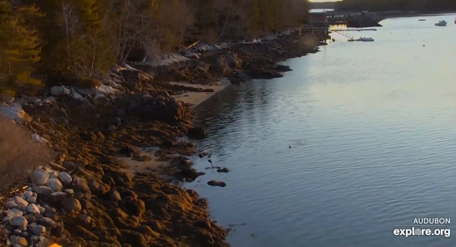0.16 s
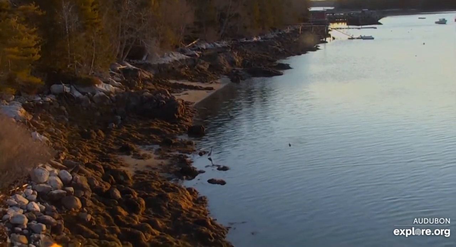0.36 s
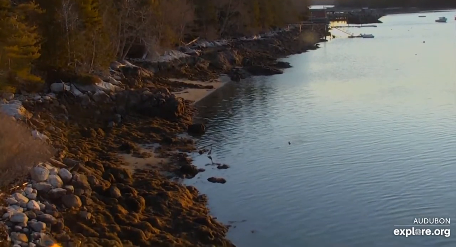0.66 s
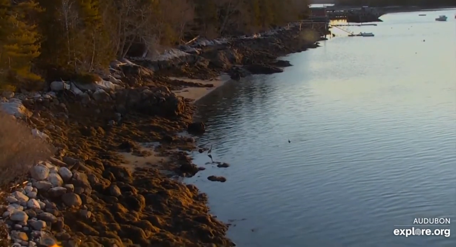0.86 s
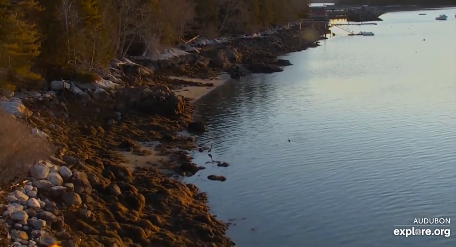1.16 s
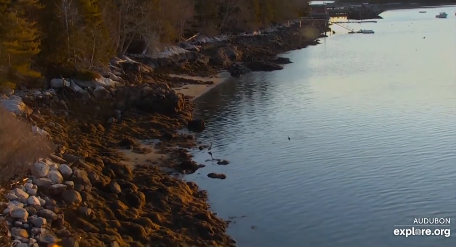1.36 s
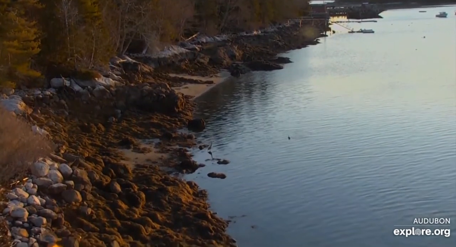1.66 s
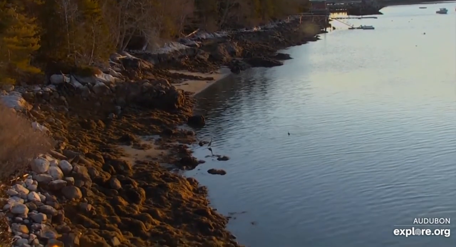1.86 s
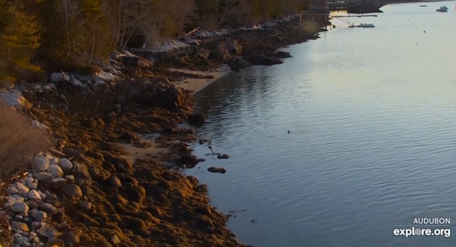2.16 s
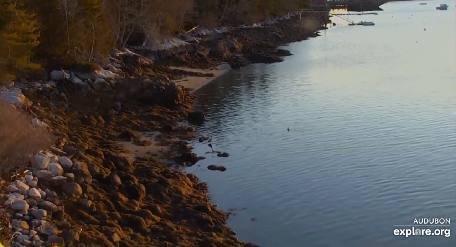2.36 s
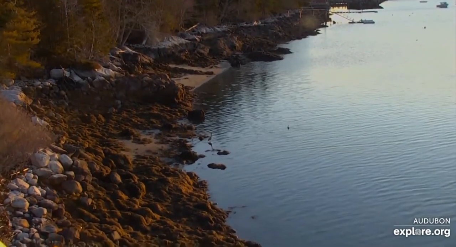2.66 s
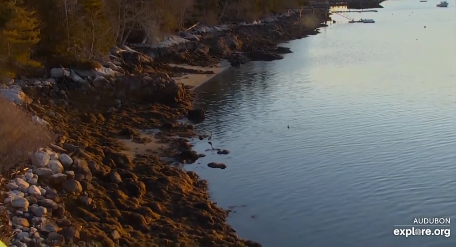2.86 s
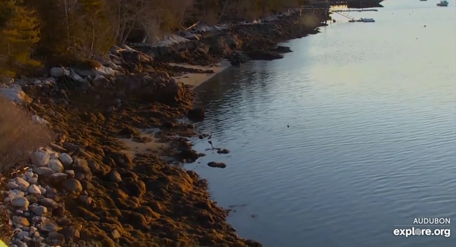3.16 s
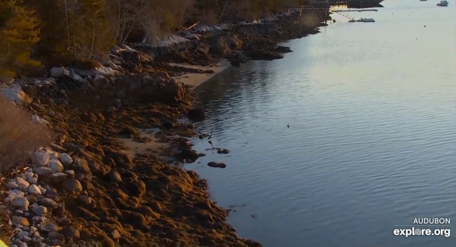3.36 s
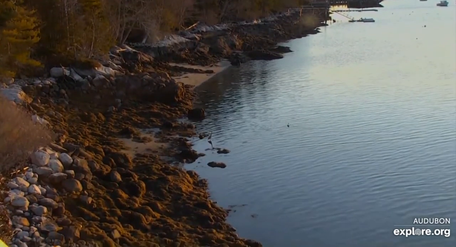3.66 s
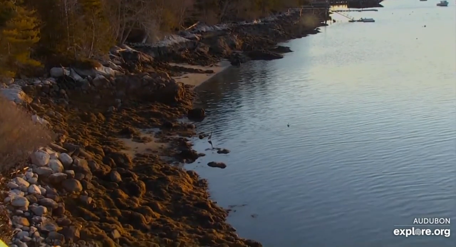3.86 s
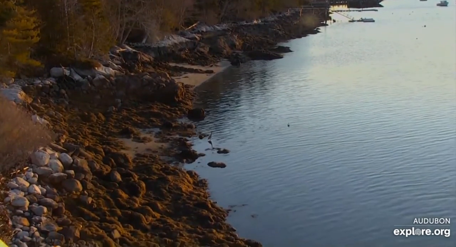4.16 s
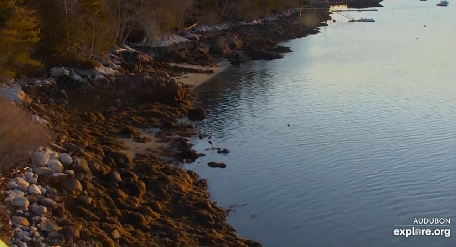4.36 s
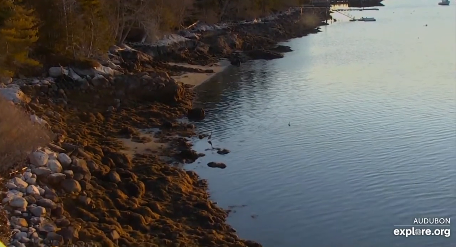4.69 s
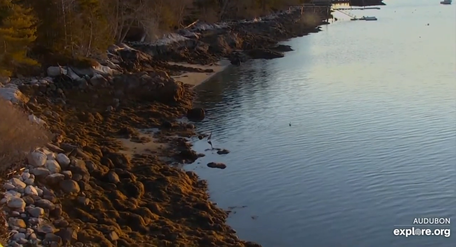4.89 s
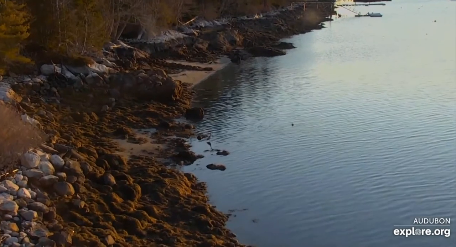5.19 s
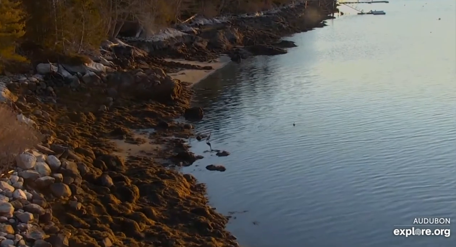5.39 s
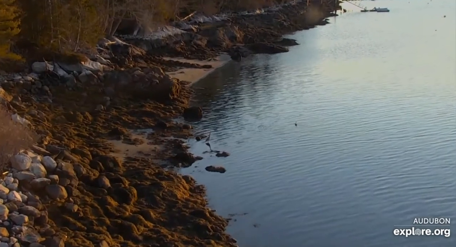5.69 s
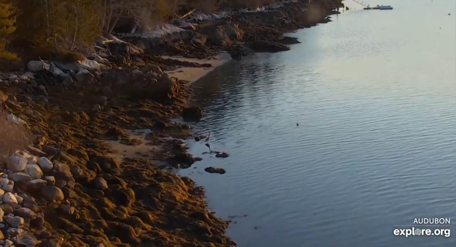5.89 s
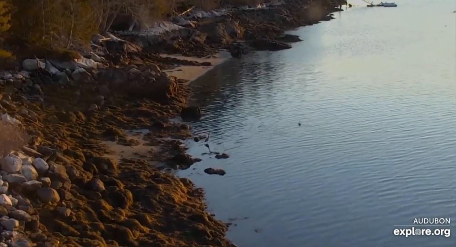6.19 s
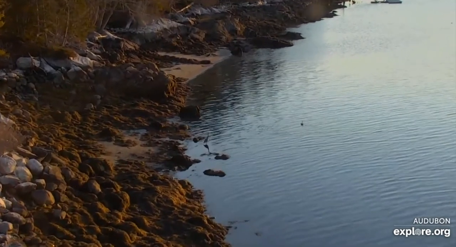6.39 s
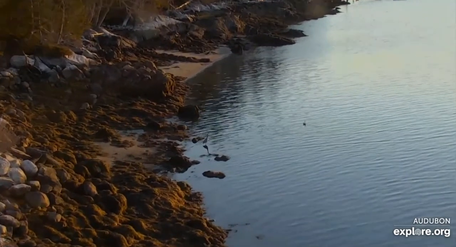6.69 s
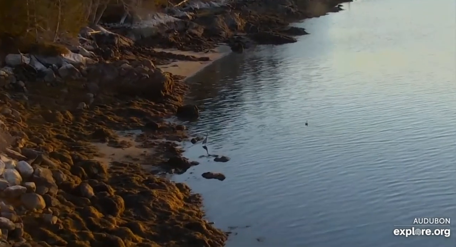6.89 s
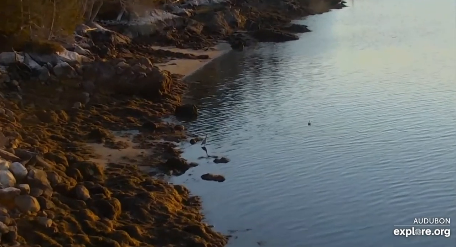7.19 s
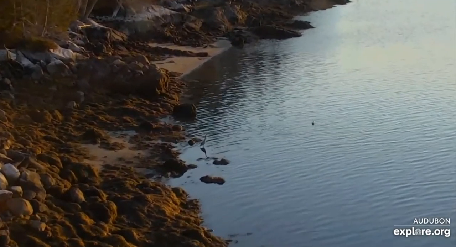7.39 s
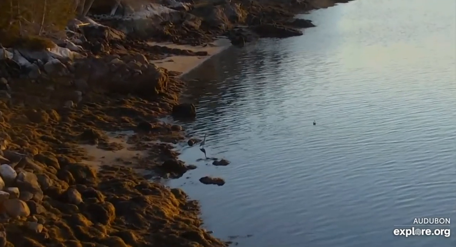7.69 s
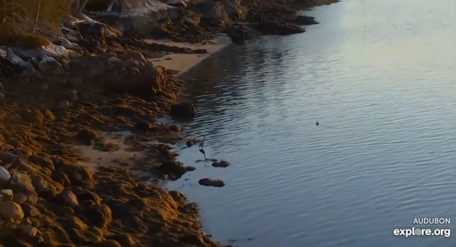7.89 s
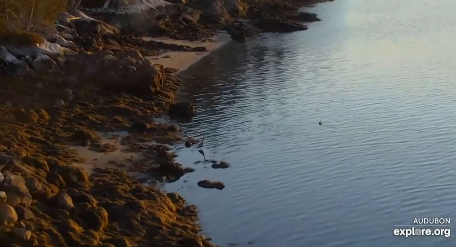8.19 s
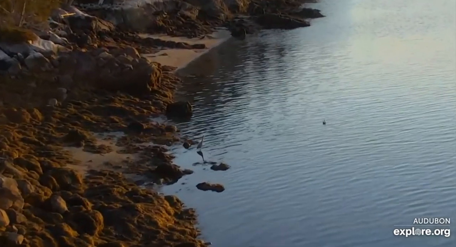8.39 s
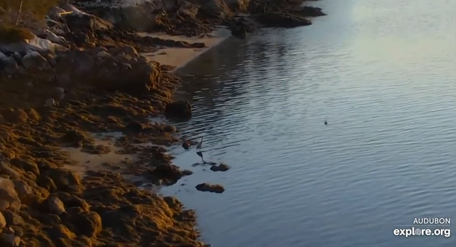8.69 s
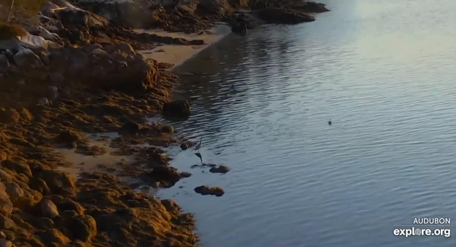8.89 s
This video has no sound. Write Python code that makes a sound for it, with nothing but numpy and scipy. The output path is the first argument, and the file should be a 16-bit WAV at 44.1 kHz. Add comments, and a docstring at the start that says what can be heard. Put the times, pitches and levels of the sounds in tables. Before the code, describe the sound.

Beside calm water, an osprey gives six short piercing down-sliding chirps, the loud ones distorting, over faint hum, light wind and tiny distant songbirds.

```python
"""Osprey calling over an inlet

An osprey whistles six sharp falling calls right beside a nest microphone; the loud ones overload it.
Each call is a sliding tone with overtones, and the trees and the far shore throw it back as many small echoes.
Small glides warble far away, and a few dry ticks of noise are heard.
Wind rumbles on the microphone, mostly at the start and the end, over a faint hum and soft outdoor noise."""
import sys
import numpy as np
from scipy import signal
from scipy.fft import rfft, irfft, next_fast_len
from scipy.io import wavfile
from scipy.ndimage import uniform_filter1d

SR = 44100
rng = np.random.default_rng(int(sys.argv[2]) if len(sys.argv) > 2 else 0)


def pcm_store(signal):
    """Save signal as 16-bit PCM."""
    levels = np.round(np.clip(np.atleast_2d(signal), -1, 1) * 32767)
    wavfile.write(sys.argv[1], SR, levels.astype(np.int16).T)


N = 399105
TIME = np.arange(N) / SR  # seconds

# level of the low hum: t/s, level/dB
HUM_LEVEL = [(0, -52), (1.5, -53), (3.0, -55.5), (4.0, -60), (5.2, -64), (6.1, -69.5), (7.0, -79.5),
             (7.6, -57), (9.05, -52.5)]
HUM_HZ = 106
# thin, nearly steady tones: f/Hz, level/dB
THIN_TONES = [(237, -85), (378, -84.5), (508, -77), (845, -75.5), (1168, -83.5), (1696, -72.5),
              (15770, -83.5)]
# spectrum of the soft outdoor noise: f/Hz, relative level/dB per Hz
AIR_COLOUR = [(25, 3.5), (80, 10), (190, -3), (400, 1), (900, 1), (1400, -1.5), (2000, -3), (2450, -3.5),
              (2850, -15.5), (4000, -14), (6000, -22.5), (10000, -21), (13000, -27.5), (16000, -29.5)]
AIR_DB = -58
# spectrum of the low wind rumble: f/Hz, relative level/dB per Hz
RUMBLE_COLOUR = [(18, -12.5), (38, -3), (55, 4), (85, 0.5), (110, -4), (150, -19), (210, -32.5),
                 (400, -44.5)]
# spectrum of the smaller, higher eddies: f/Hz, relative level/dB per Hz
EDDY_COLOUR = [(70, -20), (115, -0.5), (170, 0), (250, -12.5), (400, -17), (700, -30.5), (1400, -46),
               (3000, -66)]
# gusts on the microphone: peak t/s, half-width/s, rumble level/dB
WIND_GUSTS = [(0.048, .06, -18.5), (0.161, 0.1, -21.5), (0.339, .07, -38.5), (.68, .28, -42.5),
              (3.17, .16, -53), (5.881, .08, -44), (6.52, 0.22, -52), (7.06, .13, -51.5), (7.849, .1, -44),
              (8.52, .14, -41), (8.86, .17, -36)]
CALM_DB = -70.5  # rumble between the gusts
HARD_GUST_DB, EDDY_POWER = -19.5, 1.5  # small eddies grow faster than the rumble
DIP_S, DIP_LENGTH_S, DIP_DB = .283, .024, -21  # wind, hum and air dip briefly

# small ticks: t/s, level/dB, centre f/Hz
DRY_TICKS = [(0.14, -42, 1120), (.159, -44, 1100), (0.295, -50, 964), (1.706, -50.5, 4500),
             (4.927, -59, 3700), (6.159, -49, 4100)]

# osprey calls: t/s, length/s, top f/Hz, end f/Hz, shoulder (0-1), opening flick/Hz, flick length/s,
# attack/s, time to the dip/s, first level/dB, dip depth/dB, level after the dip/dB,
# octave level/dB, share sent to the shore/dB
OSPREY_CALLS = [(.968, 0.097, 2510, 2024, 1, 300, 0.0044, 0.0059, 0.046, -18.5, -13.5, -3.5, -18, 3),
                (2.149, 0.12, 2635, 1998, 0.93, 425, 0.0056, 0.015, 0.058, -0.3, -15, -4.5, -13, -0.5),
                (3.243, .12, 3032, 2112, 0.06, 729.4, .0096, .021, .076, 3.5, -6.5, -7, -12.2, -0.5),
                (4.328, .116, 2663, 2126, .2, 513, .007, .013, 0.053, -2, -2, -10.5, -17.5, -.5),
                (5.385, .138, 3238, 2126, 0, 1142, 0.023, 0.037, .093, 5.5, -4.5, -11.5, -13, -1.1),
                (6.66, 0.12, 2821, 2054, 0, 992, .0115, 0.024, .067, 2, -5, 1.33, -12.5, -4.5)]
GLIDE_CURVE = 1.303  # the fall slows towards the end of a call
FLICK_POWER = 3  # the opening flick hangs for a moment, then drops
ONSET_DB, RELEASE_DB, RELEASE_S = -36.5, -26.5, .026  # how far under its level a call starts and ends
SAG_S, RECOVER_S = .022, .018  # the level sags into a short dip and recovers
# how strongly the throat passes the octave: f/Hz, gain/dB
THROAT_GAIN = [(3900, -7.5), (4300, -8.5), (4750, -0.5), (5200, -5), (5800, -8), (6600, -27.5),
               (8800, -49.5)]
# spectrum of the breath in a call: f/Hz, relative level/dB per Hz
BREATH_COLOUR = [(1400, -22.5), (2500, -1.5), (5000, 1), (12000, -26.5)]

# tone colour of what the shore sends back: f/Hz, gain/dB
ECHO_COLOUR = [(1900, -2.5), (2400, 8), (2800, -7), (3400, -11.5), (4500, -2), (5800, -4.5), (7000, 2.5),
               (10000, -2), (15000, -21)]
ROCKS_DB = -5
TREES_S, TREES_RISE_S, TREES_DB, TREES_T60_S = .095, .045, -.5, .35  # T60: time to fade by 60 dB
INLET_DB, INLET_T60_S = -26.5, 2.9
FAR_BANK_S, FAR_BANK_WIDTH_S, FAR_BANK_DB = .8, .12, -40.5  # a last soft swell from the far bank

# two phrases of a distant songbird, a row a note:
# t in the phrase/s, length/s, start f/Hz, middle f/Hz, end f/Hz, level within the phrase/dB
CHIP_NOTES = [(0, 0.04, 6240, 5650, 5190, -7), (.028, 0.029, 5454, 4530, 3673, 4.5),
              (.068, .06, 3200, 3450, 3900, -6.5)]
SLUR_NOTES = [(0, 0.088, 3780, 4340, 5700, 0), (.103, 0.023, 5150, 4430, 3810, 0)]
# when each phrase is sung: t/s, level/dB
CHIP_TIMES = [(2.614, -60), (2.812, -60), (2.99, -61), (3.183, -65.5), (8.15, -70), (8.34, -69),
              (8.515, -68.5)]
SLUR_TIMES = [(3.596, -61), (3.86, -62.5), (4.13, -63.5)]
# single distant notes: t/s, length/s, start f/Hz, middle f/Hz, end f/Hz, level/dB
SINGLE_NOTES = [(2.435, .085, 4870, 4380, 5000, -56), (2.518, .016, 3760, 4440, 5400, -58),
                (7.27, 0.063, 3794, 4080, 4150, -71.5), (7.694, 0.0713, 3250, 3370, 3610, -71),
                (7.897, 0.29, 1644, 1676, 1690, -61), (7.96, .13, 3993, 4400, 4570, -70),
                (8.211, .09, 3700, 3840, 3980, -71), (8.69, .11, 4320, 4660, 4640, -58),
                (8.92, .11, 4180, 4250, 5200, -66)]

# rasp of the overload: f/Hz, relative level/dB per Hz
RASP_COLOUR = [(300, -9.5), (1500, -5), (3000, -1), (16000, -5.5)]
# thump of the overload: f/Hz, relative level/dB per Hz
THUMP_COLOUR = [(30, -15.5), (70, 3), (110, 1), (170, -11.5), (260, -17.5), (450, -28.5)]
# final tone balance, lower near 10 kHz and a little raised near 13 kHz: f/Hz, gain/dB
INPUT_COLOUR = [(1, 1.5), (7000, -0.5), (10000, -3), (13000, 1), (23000, .5)]
TOP_HZ = 15900  # nearly everything above this is cut


def undb(db):
    """Turns decibels into gain."""
    return np.exp(np.asarray(db) * np.log(10) / 20)


def ramp(t, start, length):
    """Rises from 0 to 1 over the given stretch of time."""
    return np.clip((t - start) / length, 0, 1)


def walk(rate, count=N):
    """Wanders at random: values held for 1 / rate seconds and smoothed twice; spread 1."""
    k = max(int(SR / rate), 1)
    y = np.repeat(rng.standard_normal(count // k + 1), k)
    y = uniform_filter1d(uniform_filter1d(y, k), k)[:count]
    return y / y.std()


def shape(x, colour):
    """Filters a sound with a spectrum given as (Hz, dB) points."""
    hz, db = np.transpose(colour)
    size = next_fast_len(len(x), True)
    f = np.maximum(np.fft.rfftfreq(size, 1 / SR), 1)
    gain = undb(np.interp(np.log(f), np.log(hz), db, left=-120, right=-120))
    return irfft(rfft(x, size) * gain, size)[:len(x)]


def noise(colour, count=N):
    """Coloured noise with an average strength (rms) of 1."""
    y = shape(rng.standard_normal(count), colour)
    return y / y.std()


def butter(x, hz, kind, order=2):
    """Low-pass or high-pass filter."""
    sos = signal.butter(order, min(hz, .45 * SR), kind, fs=SR, output="sos")
    return signal.sosfilt(sos, x)


def hum(waver=.0015, thin_waver=.0008):
    """A low wavering hum with a few thin tones above it, all plain sine waves."""
    def line(hz, depth):
        return np.sqrt(2) * np.sin(2 * np.pi * np.cumsum(hz * (1 + depth * walk(3.7))) / SR)

    s, db = np.transpose(HUM_LEVEL)
    low = undb(np.interp(TIME, s, db)) * line(HUM_HZ, waver)
    return low + sum(undb(db) * line(hz, thin_waver) for hz, db in THIN_TONES)


def outdoor_air():
    """Soft outdoor noise whose level drifts slightly."""
    return noise(AIR_COLOUR) * undb(AIR_DB + .3 * walk(8.0))


def wind(eddy_db=-32.0, flutter_db=1.0):
    """Each gust swells and fades, rumbling on the microphone; hard gusts shed smaller, higher eddies too."""
    rumble = noise(RUMBLE_COLOUR)
    rumble = rumble / np.sqrt(uniform_filter1d(rumble ** 2, SR // 8))  # evens out its level
    force = undb(CALM_DB)
    for s, width, db in WIND_GUSTS:
        force = force + undb(db) * np.exp(-((TIME - s) / width) ** 2)
    eddy_force = (force / undb(HARD_GUST_DB)) ** EDDY_POWER
    eddies = eddy_force * undb(eddy_db + flutter_db * walk(66)) * noise(EDDY_COLOUR)
    return (force * rumble + eddies) * ramp(TIME, 0, .01)


def ticks(decay_s=.0015):
    """Faint dry ticks, each a few milliseconds of noise around its own pitch."""
    out = np.zeros(N)
    t = np.arange(SR // 30) / SR
    for s, db, hz in DRY_TICKS:
        burst = noise([(hz / 4, -22), (hz, 0), (1.5 * hz, -18), (8 * hz, -45)], count=len(t))
        i = int(s * SR)
        out[i:i + len(t)] += undb(db) * burst * np.exp(-t / decay_s)
    return out


def whistle(call, jitter=.0015, third_db=-25, step_db=-14, breath_db=-46, octave_turn=.1,
            flutter_depth=.36, flutter_hz=100, octave_attack_s=.022, octave_release_db=-24, uneven_db=3.0):
    """One call, for the microphone and for the shore: a tone that flicks down, glides, dips and flutters."""
    (s, length, top_hz, end_hz, shoulder, flick_hz, flick_s, attack_s, dip_s,
     first_db, dip_db, second_db, octave_db, shore_db) = call
    live = (TIME > s) & (TIME < s + length)
    t = TIME[live] - s

    def wander(rate):
        return walk(rate, count=SR // 4)[:len(t)]

    # pitch: without a shoulder it falls at once, with one it lingers first
    falling = (1 - t / length) ** GLIDE_CURVE
    lingering = np.cos(np.pi / 2 * t / length) ** 2
    glide = (1 - shoulder) * falling + shoulder * lingering
    flick = flick_hz / (1 + (t / flick_s) ** FLICK_POWER)
    hz = end_hz + (top_hz - end_hz) * glide + flick

    # level of the main tone
    sag = ramp(t, dip_s - SAG_S, SAG_S) ** 2
    recovery = ramp(t, dip_s, RECOVER_S)
    release = ramp(t, length - RELEASE_S, RELEASE_S)
    db = first_db + (second_db - first_db) * sag + dip_db * (sag - recovery)
    db = db + ONSET_DB * (1 - ramp(t, 0, attack_s)) ** 2 + RELEASE_DB * release

    # level of the overtones, set by the throat
    throat_hz, throat_db = np.transpose(THROAT_GAIN)
    over_db = octave_db + np.interp(2 * hz, throat_hz, throat_db)
    over_db = over_db + octave_release_db * release + uneven_db * wander(90)
    over_gain = undb(over_db) * ramp(t, 0, octave_attack_s)

    phase = 2 * np.pi * np.cumsum(hz * (1 + jitter * wander(700))) / SR
    overtones = np.sin(2 * phase + 2 * np.pi * octave_turn)
    for k in range(3, 7):
        flicker_db = 3 * wander(250)
        overtones += undb(third_db + step_db * (k - 3) + flicker_db) * np.sin(k * phase)
    # air rushes through the throat with the tone
    tone = np.sin(phase) + undb(breath_db) * noise(BREATH_COLOUR, count=SR // 4)[:len(t)]

    def voice(size):
        return tone * uniform_filter1d(undb(db), size) + overtones * uniform_filter1d(over_gain, size)

    # after the dip the quieter note flutters as a near reflection beats with it
    beat = 2 * np.pi * np.cumsum(flutter_hz * (1 + .18 * wander(100))) / SR
    flutter_amount = ramp(t, dip_s - RECOVER_S / 2, RECOVER_S) * np.clip(-db / 9, 0, 1)
    flutter = 1 + flutter_depth * flutter_amount * np.sin(beat)
    near = voice(size=SR // 300) * flutter * signal.windows.tukey(len(t), .1)
    # summed over all directions the call is more even than at one spot
    far = undb(shore_db) * voice(size=SR // 20) * signal.windows.tukey(len(t), .25)
    out = np.zeros((2, N))
    out[:, live] = near, far
    return out


def shore(x, wet_db=-27.0):
    """Thousands of rocks and trunks scatter the call, each with its own delay and strength."""
    t = np.arange(2 * SR) / SR
    swell_db = ROCKS_DB + (TREES_DB - ROCKS_DB) * ramp(t, TREES_S - TREES_RISE_S, TREES_RISE_S)
    close = undb(swell_db) * np.exp(-np.log(1000) * np.maximum(t - TREES_S, 0) / TREES_T60_S)
    inlet = undb(INLET_DB) * np.exp(-np.log(1000) * t / INLET_T60_S)
    bank = undb(FAR_BANK_DB) * np.exp(-((t - FAR_BANK_S) / FAR_BANK_WIDTH_S) ** 2)
    faces = (rng.random(len(t)) < 4000 / SR) & (t > .004)  # about 4000 echoes a second
    scatter = faces * rng.standard_normal(len(t)) * np.hypot(close, inlet + bank)
    scatter = scatter / np.sqrt(np.sum(scatter ** 2))
    return undb(wet_db) * signal.fftconvolve(shape(x, ECHO_COLOUR), scatter)[:N]


def far_birds(wet_db=-3.5, t60=.25):
    """Thin, slightly husky glides from the trees, blurred by fading echoes of the wood."""
    notes = list(SINGLE_NOTES)
    for phrase, times in ((CHIP_NOTES, CHIP_TIMES), (SLUR_NOTES, SLUR_TIMES)):
        for s, db in times:
            for after, *glide, note_db in phrase:
                notes.append((s + after, *glide, db + note_db))
    out = np.zeros(N + SR)
    husk = 1 + .012 * walk(500)  # shakes the pitch
    for s, length, start, middle, end, db in notes:
        u = np.linspace(0, 1, int(length * SR))
        i = int(s * SR)
        bend = np.polyfit([0, .5, 1], [start, middle, end], 2)  # smooth curve through three pitches
        hz = np.polyval(bend, u) * np.roll(husk, -i)[:len(u)]
        out[i:i + len(u)] += undb(db) * np.sin(np.pi * u) * np.sin(2 * np.pi * np.cumsum(hz) / SR)
    wood = rng.standard_normal(SR) * np.exp(-np.log(1000) * np.arange(SR) / SR / t60)
    wood = wood / np.sqrt(np.sum(wood ** 2))
    return out[:N] + undb(wet_db) * signal.fftconvolve(out, wood)[:N]


def scene():
    """The osprey and its echoes over the quiet inlet."""
    near, far = sum(whistle(call) for call in OSPREY_CALLS)
    air = outdoor_air()
    in_dip = (np.abs(TIME - DIP_S) < DIP_LENGTH_S / 2) * 1.
    dip = undb(DIP_DB * uniform_filter1d(in_dip, size=SR // 200))
    birds = near + shore(far) + far_birds()
    background = (wind() + hum() + air) * dip
    return (birds + background + ticks())[None]


def record(dry, ceiling=.86, knee=16, rasp_db=-38, thump_db=-35):
    """The input stage saturates on loud calls, adding odd harmonics, a rasp and a low thump; the top is cut."""
    fine = signal.resample_poly(dry[0], 4, 1)  # a finer time grid keeps most false tones out of the clipping
    squeezed = fine / (1 + (np.abs(fine) / ceiling + 1e-6) ** knee) ** (1 / knee)
    clipped = signal.resample_poly(squeezed, 1, 4)
    over = (np.abs(dry[0]) > ceiling) * 1.
    rasp = undb(rasp_db) * noise(RASP_COLOUR) * uniform_filter1d(over, SR // 300)
    # the stage recovers slowly, so the thump trails the overload a little
    thump = undb(thump_db) * noise(THUMP_COLOUR) * butter(over, 15, "low")
    y = butter(shape(clipped + rasp + thump, INPUT_COLOUR), 18, "high")
    top_cut = signal.ellip(10, .1, 80, TOP_HZ, fs=SR, output="sos")
    return signal.sosfilt(top_cut, y)[None]


dry = scene()
out = record(dry)
pcm_store(out)
```